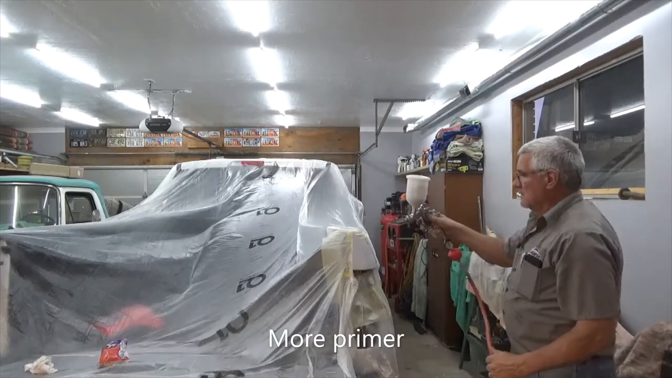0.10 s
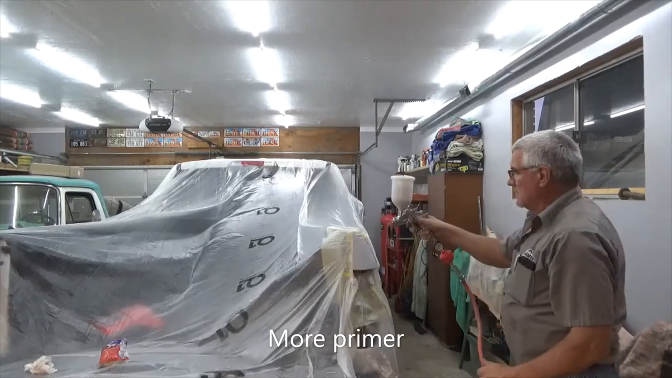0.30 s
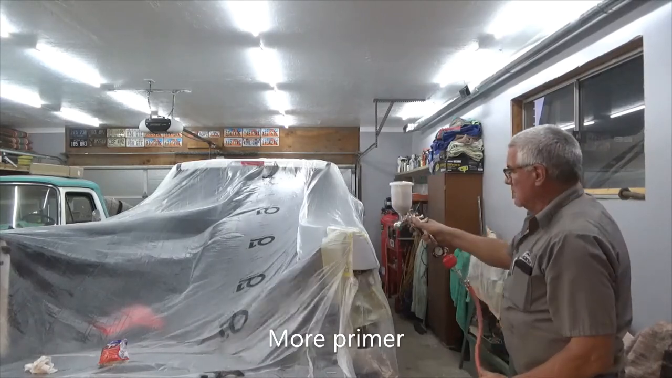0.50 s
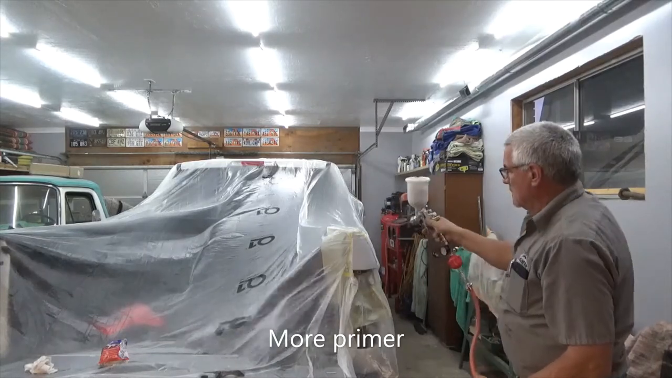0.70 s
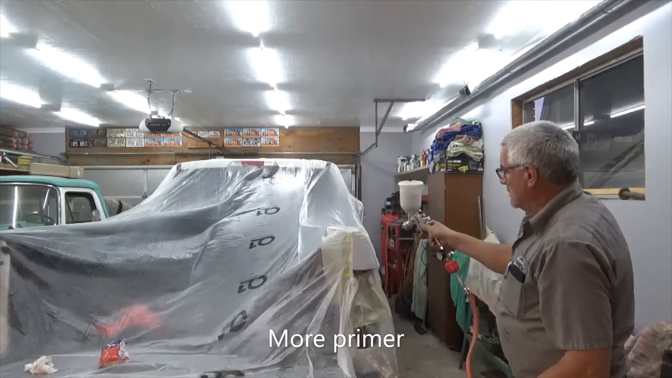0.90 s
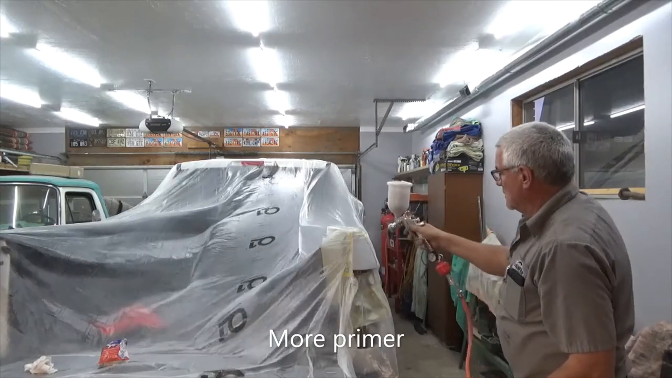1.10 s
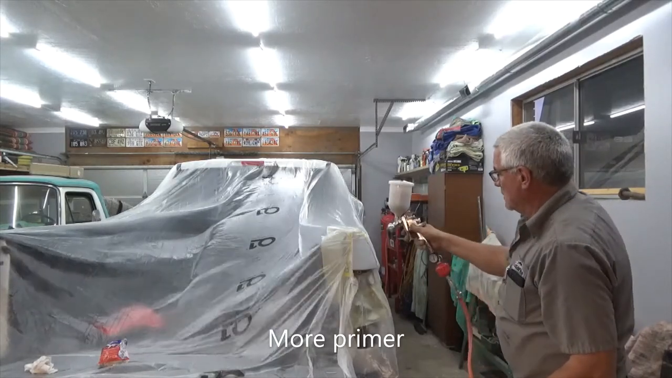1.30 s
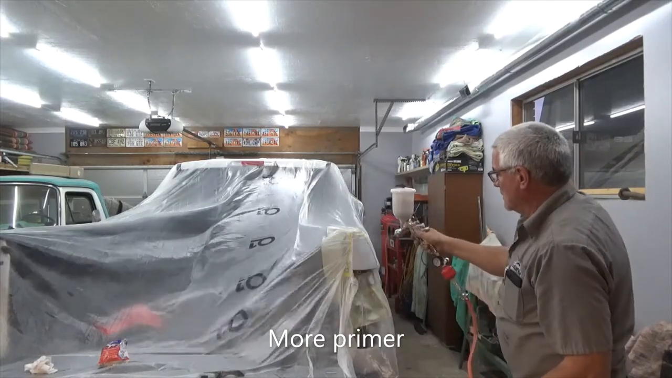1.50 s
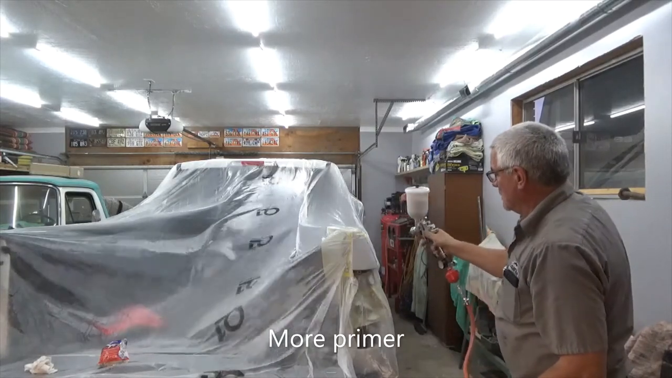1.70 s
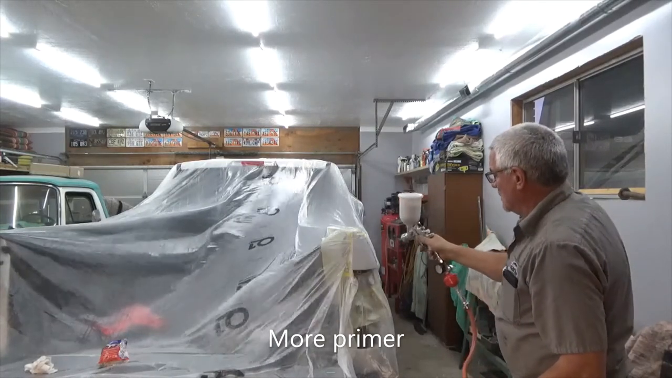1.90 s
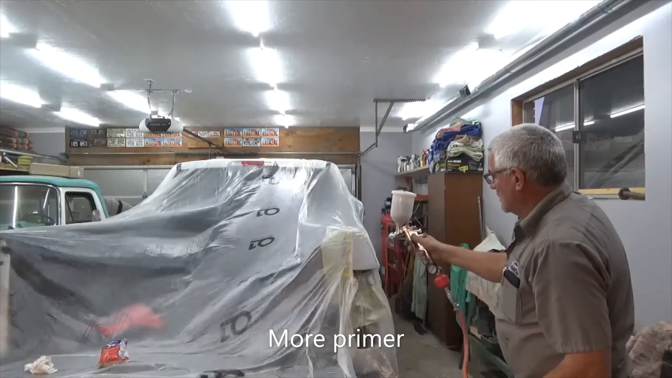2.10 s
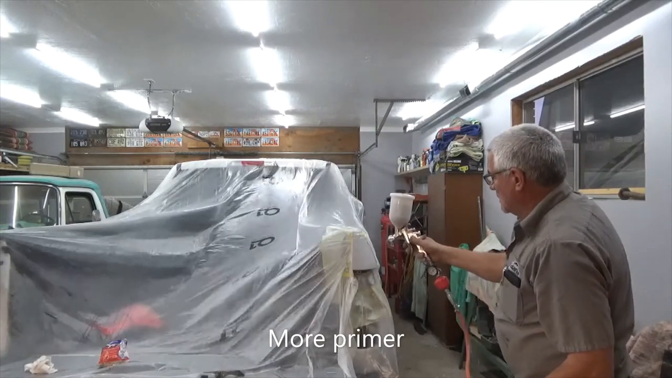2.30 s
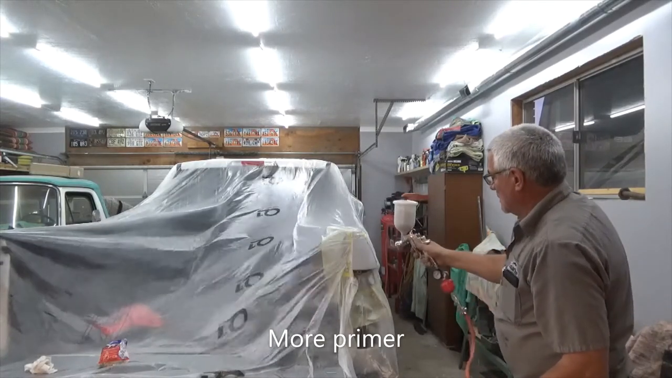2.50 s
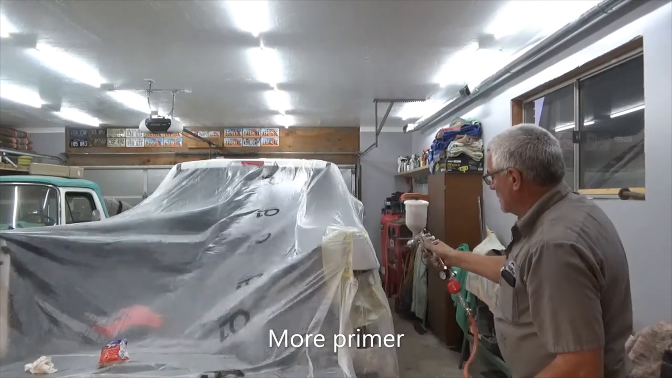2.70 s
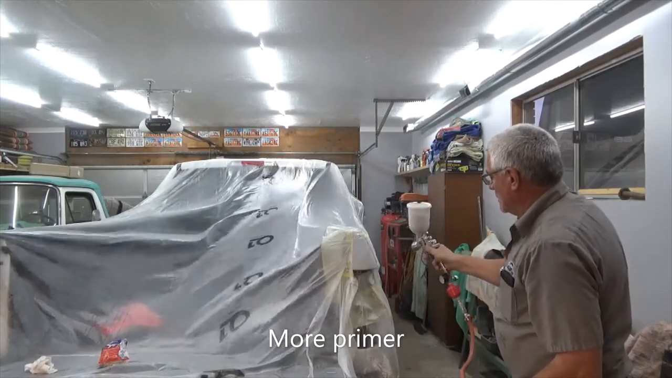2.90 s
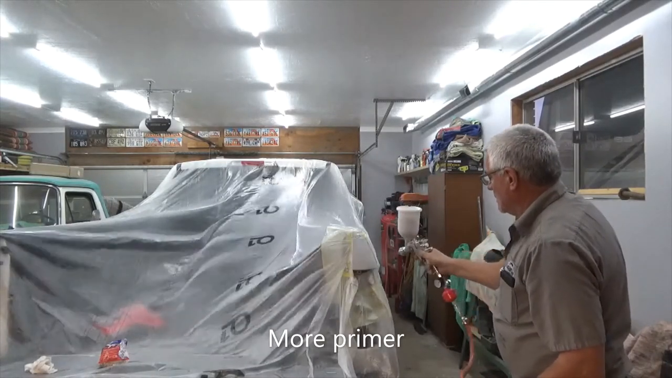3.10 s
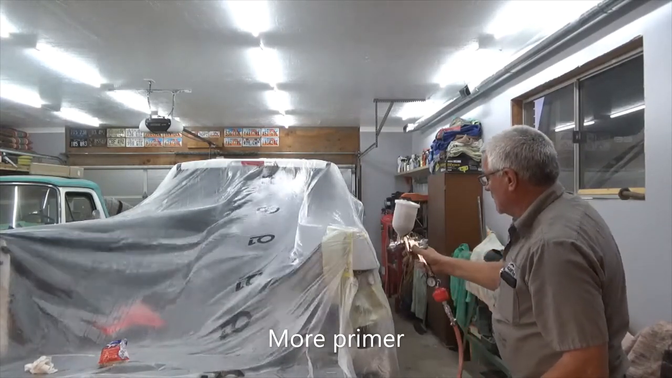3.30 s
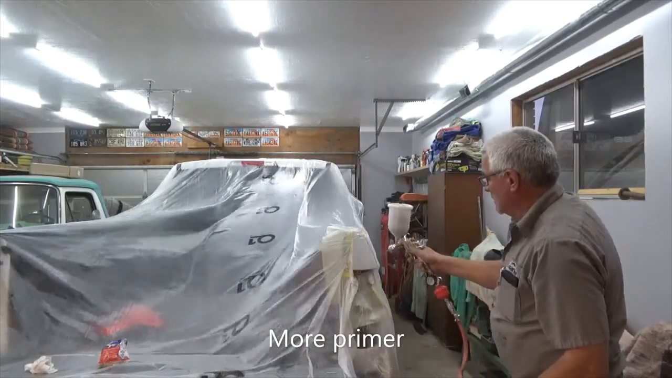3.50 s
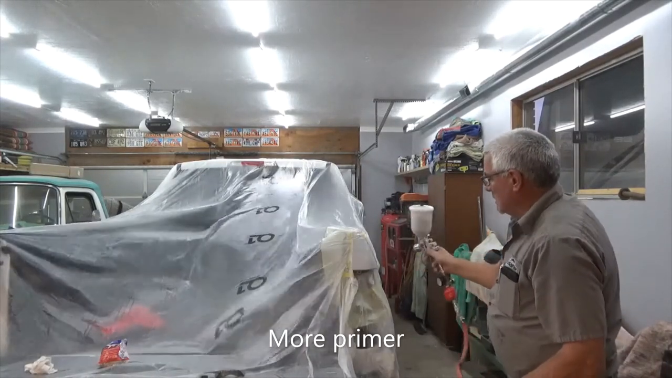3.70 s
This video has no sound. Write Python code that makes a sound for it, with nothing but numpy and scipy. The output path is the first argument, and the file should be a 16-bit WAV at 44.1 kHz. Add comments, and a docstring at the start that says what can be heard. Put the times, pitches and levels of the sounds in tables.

```python
"""A paint spray gun fires seven short bursts of primer in a garage, over the low hum of a fan.
Each pull of the trigger first lets out the pressure stored in the hose, then settles to a hiss of air and paint:
coloured noise with faint whistles, droplet clicks and a thump as the valve shuts. One pull ends in a splutter.
The room carries the hiss on briefly, and the fan is noise in low resonances under two wavering sine tones.
The recorder's gain control ducks the hum at each surge."""
import sys
import numpy as np
from scipy import signal
from scipy.fft import rfft, irfft
from scipy.io import wavfile

SR = 44100
rng = np.random.default_rng(int(sys.argv[2]) if len(sys.argv) > 2 else 0)


def persist_wave(psi):
    """Save psi, clipped to +-1, as 16-bit WAV."""
    counts = np.round(np.clip(psi, -1, 1) * 32767).astype(np.int16)
    wavfile.write(sys.argv[1], SR, np.atleast_2d(counts).T)


N = 171990


def amp(db):
    """Decibels to gain."""
    return 10 ** (np.asarray(db) / 20)


def evened(x):
    """Scales to rms 1."""
    return x / np.sqrt(np.mean(x ** 2) + 1e-20)


def noise():
    """White noise for the whole scene."""
    return rng.standard_normal(N)


def read(points, hz):
    """Reads a table on a log-frequency axis."""
    f, value = np.transpose(points)
    return np.interp(np.log(hz + 1), np.log(f + 1), value)


def colour(x, points):
    """Filters a sound by a table of levels over frequency, then scales it to rms 1."""
    gain = amp(read(points, np.fft.rfftfreq(N, 1 / SR)))
    return evened(irfft(rfft(x) * gain, N))


def ring(hz, width):
    """Noise in one steep resonance, at rms 1; the width in Hz is taken at half amplitude."""
    f = np.fft.rfftfreq(N, 1 / SR)
    resonance = 1 / (1 + ((f - hz) / (.5 * width)) ** 2)
    return evened(irfft(rfft(noise()) * resonance, N))


def wander(rate_hz):
    """Slow random motion around zero, at rms 1."""
    f = np.fft.rfftfreq(N, 1 / SR)
    slow = np.exp(-(f / rate_hz) ** 2) * (f > 0)
    return evened(irfft(rfft(noise()) * slow, N))


def widen(mid, side, likeness):
    """Blends two unrelated sounds into left and right with a given likeness per frequency."""
    c = np.clip(read(likeness, np.fft.rfftfreq(len(mid), 1 / SR)), -1, 1)
    m = rfft(mid) * np.sqrt((1 + c) / 2)
    s = rfft(side) * np.sqrt((1 - c) / 2)
    return irfft(np.array([m + s, m - s]), len(mid))


def pan(db):
    """Left and right gains for a level difference; positive leans left."""
    return amp([[db / 2], [-db / 2]])


def trigger():
    """Each pull opens the valve: stored air surges and decays, paint follows, and shutting it sets off a thump."""
    # trigger pulls: (open [s], shut [s], level [dB], extra surge of stored air [dB],
    # growth over the pull [dB], extra paint [dB], extra thump at closing [dB])
    pulls = [(0.228, 0.576, -.5, 0.5, -1.5, 1.5, 3), (0.825, 1.127, 0, -2, 0, 0.5, 0.5),
             (1.258, 1.600, 0, 2, -1, -1, -1), (1.765, 2.121, .5, -0.5, -1.5, -.5, -2),
             (2.237, 2.708, -1, 4, -1, -.5, -4), (2.862, 3.22, -1.5, -0.5, 3.5, .5, 2),
             (3.352, 3.587, 0, -1, -0.5, -.5, -5)]
    open_s, shut_s = 0.02, .013  # rise time, decay constant of the valve
    surge_db, surge_s = 14.5, .03
    paint_s = 0.023  # time constant of the paint starting to flow
    thump_level_db, thump_s = -35.5, 0.018
    t = np.arange(N) / SR
    air, paint, thump = np.zeros((3, N))
    for start, stop, db, extra_db, growth_db, paint_db, thump_db in pulls:
        age = np.maximum(t - start + open_s / 4, 0)  # opening begins slightly early
        since_shut = np.maximum(t - stop, 0)
        valve = np.minimum(age / open_s, 1) ** 2 * np.exp(-since_shut / shut_s)
        progress = np.minimum(age / (stop - start), 1)
        flow = amp(db + growth_db * (progress - .5))
        surge = amp(surge_db + extra_db) * np.exp(-age / surge_s)
        air += valve * (flow + surge)
        paint += valve * flow * amp(paint_db) * (1 - np.exp(-age / paint_s))
        thump += amp(thump_level_db + thump_db) * (t > stop) * np.exp(-since_shut / thump_s)
    return air, paint, thump


def air_jet():
    """Turbulent air through the nozzle: coloured noise plus faint resonances, with a fast flutter in level."""
    # bare air jet: (frequency [Hz], level per Hz [dB])
    air_spectrum = [(200, -42), (700, -30.5), (1500, -20.5), (3000, -14), (5000, -7), (6500, -4), (8200, 1),
                    (9300, 2.5), (11000, -5)]
    # faint nozzle resonances: (frequency [Hz], width [Hz], level [dB])
    whistles = [(3940, 63, -47.5), (8950, 67, -48), (2450, 130, -58)]
    air_db, flutter_db, flutter_hz = -19.5, .5, 40
    jet = amp(air_db) * colour(noise(), air_spectrum)
    jet += sum(amp(db) * ring(hz, width) for hz, width, db in whistles)
    return jet * amp(flutter_db * wander(flutter_hz))


def paint_mist():
    """Atomised paint: fuller noise, sparse clicks of droplets that break up, and an uneven feed."""
    # atomised paint: (frequency [Hz], level per Hz [dB])
    paint_spectrum = [(200, -21), (500, -12), (1000, -9.5), (2000, -3.5), (3200, 0), (5000, 1), (8000, 6),
                      (11000, -4.5)]
    mist_db, pulsing_db, pulsing_hz = -22.5, 1, 7.4
    spits_per_s, spit_db = 430, -11.5  # spit level is relative to the noise
    spits = evened(noise() * (rng.random(N) < spits_per_s / SR))
    mist = amp(mist_db) * colour(noise() + amp(spit_db) * spits, paint_spectrum)
    return mist * amp(pulsing_db * wander(pulsing_hz))


def gun():
    """The trigger shapes the jet and the mist; the stopped air column thumps as noise in a broad resonance."""
    air, paint, thump = trigger()
    return air * air_jet() + paint * paint_mist() + thump * ring(340, 420)


def splutter():
    """A short hollow rush at the nozzle as one pull ends: midrange noise under a bell-shaped swell."""
    # hollow rush: (frequency [Hz], level per Hz [dB])
    splutter_spectrum = [(300, -20), (700, -6), (1200, 1), (1900, 2), (2600, -9), (5000, -28)]
    at_s, spread_s, splutter_db = 3.218, 0.029, -35
    swell = np.exp(-((np.arange(N) / SR - at_s) / spread_s) ** 2)
    return amp(splutter_db) * swell * colour(noise(), splutter_spectrum)


def leak():
    """A thin hiss of air that escapes all the time and slowly grows."""
    # leaking air: (frequency [Hz], level per Hz [dB])
    leak_spectrum = [(1500, -18), (3000, -9), (6000, -2), (8500, 2.5), (11000, -7)]
    start_db, rise_db_per_s = -53, 1.1
    level_db = start_db + rise_db_per_s * np.arange(N) / SR
    return amp(level_db) * colour(noise(), leak_spectrum)


def garage(x):
    """Direct sound, scatter from nearby surfaces that widens it, and a noise tail with its own decay per frequency."""
    # decay of the tail: (frequency [Hz], time to fall 60 dB [s])
    room_decay = [(250, 0.1), (1000, 0.57), (2500, 0.64), (5000, .48), (8000, 0.39), (11000, 0.58)]
    # strength of the tail: (frequency [Hz], level [dB])
    room_level = [(250, -5.5), (1000, 0.5), (2500, 0), (5000, -1.5), (8000, -4), (11000, -11)]
    # left-right likeness of the tail: (frequency [Hz], likeness [0-1])
    tail_likeness = [(250, 1), (1000, 0.56), (2000, 0.47), (4000, 0.53), (8000, 0.61), (11000, 0.71)]
    # left-right likeness of the direct sound with its scatter: (frequency [Hz], likeness [0-1])
    direct_likeness = [(250, 0.95), (1000, 1), (2000, 0.88), (4000, 0.88), (8000, 0.88), (11000, 0.93)]
    delay_s, scatter_s, balance_db = .004, .004, -0.1
    age = np.arange(SR) / SR
    hz, t, z = signal.stft(rng.standard_normal((2, SR)), SR, nperseg=256)
    t60 = read(room_decay, hz)[:, None]
    decay = np.exp(-np.log(1000) * t / t60)
    even_energy = np.sqrt(2 * np.log(1000) / (t60 * SR))  # long decays gain no extra energy
    z = z * amp(read(room_level, hz))[:, None] * decay * even_energy
    tails = signal.istft(z, SR, nperseg=256)[1][:, :SR] * (age > delay_s)
    scatter = rng.standard_normal(SR) * np.exp(-age / scatter_s)
    direct = 1. * (age == 0)
    response = widen(*tails, tail_likeness)
    response += widen(direct, scatter / np.linalg.norm(scatter), direct_likeness)
    return signal.fftconvolve(x[None], response, axes=1)[:, :N] * pan(balance_db)


def moving(x, count=6):
    """Crossfades the sound from one spot in the garage to the next, as the gun sweeps through new room paths."""
    sweep_hz = 1.1  # rounds of all the spots per second
    place = np.arange(N) / SR * sweep_hz * count
    spots = []
    for k in range(count):
        apart = np.minimum(abs((place - k + count / 2) % count - count / 2), 1)
        spots.append(garage(x * np.cos(np.pi / 2 * apart)))
    return sum(spots)


def motor_hum():
    """Two sine tones that share a wavering pitch, each with its own wavering level."""
    # motor tones: (frequency [Hz], level [dB])
    hum_lines = [(58.4, -46), (116.8, -44.5)]
    waver_db, waver_hz, drift = 2, 8, 0.0061  # drift: rms pitch change as a fraction
    turns = np.cumsum(1 + drift * wander(waver_hz)) / SR
    hum = 0
    for hz, db in hum_lines:
        tone = np.sin(2 * np.pi * (hz * turns + rng.random()))
        hum = hum + amp(db) * evened(tone * amp(waver_db * wander(waver_hz)))
    return hum


def fan_air():
    """Air rumble: low noise plus the room resonances that it excites."""
    # air rumble: (frequency [Hz], level per Hz [dB])
    rumble_spectrum = [(20, -7), (40, -7), (70, -4.5), (85, 4.5), (135, 2.5), (185, -6.5), (300, -3),
                       (450, -7), (650, -11), (1100, -13), (2000, -17.5), (4000, -23), (11000, -33)]
    # room resonances: (frequency [Hz], width [Hz], level [dB])
    booms = [(104, 32, -47.5), (122.7, 25, -41.5), (232.6, 20, -57.5), (288.6, 43, -50.5), (357, 23, -54),
             (406.6, 23, -53.5), (466.6, 11.5, -54.5)]
    rumble = amp(-38.5) * colour(noise(), rumble_spectrum)
    return rumble + sum(amp(db) * ring(hz, width) for hz, width, db in booms)


def fan():
    """Wide booming air with the motor hum in the middle, the whole leaning slightly left."""
    # left-right likeness of the rumble: (frequency [Hz], likeness [0-1])
    fan_likeness = [(30, .99), (120, 1), (250, 0.94), (500, 0.92), (1000, 0.68), (4000, 0.44), (11000, 0.4)]
    balance_db = 0.8
    return (widen(fan_air(), fan_air(), fan_likeness) + motor_hum()) * pan(balance_db)


def scene():
    """The gun in the garage, over the fan."""
    return moving(gun() + splutter() + leak()) + fan()


def record(dry):
    """Fast gain control restrains the hiss and ducks everything with it; then a band limit cuts the top."""
    limit_db, limit_ratio = -17, 5.5
    sense_s, react_s, recover_db_per_s = 0.0013, 0.0021, 250
    edge_hz = 11170
    keep, lag = np.exp(-1 / (sense_s * SR)), np.exp(-1 / (react_s * SR))
    power = signal.lfilter([1 - keep], [1, -keep], (dry ** 2).mean(0))
    power_db = 10 * np.log10(power + 1e-12)
    # peaks are held, then let go at a steady rate
    fall = np.arange(N) / SR * recover_db_per_s
    peak_db = np.maximum.accumulate(power_db + fall) - fall
    over_db = np.maximum(peak_db - limit_db, 0)
    # smoothed in both directions, so the gain starts to move just ahead of a surge
    smooth_db = signal.filtfilt([1 - lag], [1, -lag], over_db)
    held = dry / amp((1 - 1 / limit_ratio) * smooth_db)
    lowpass = signal.firwin(601, edge_hz, window=("kaiser", 9), fs=SR)
    return signal.oaconvolve(held, lowpass[None], "same")


dry = scene()
out = record(dry)
persist_wave(out)
```